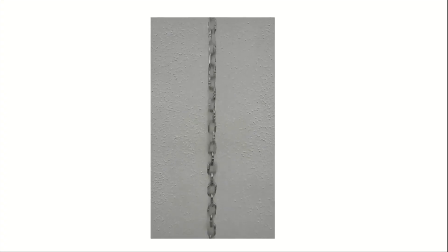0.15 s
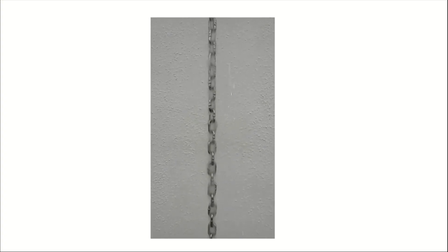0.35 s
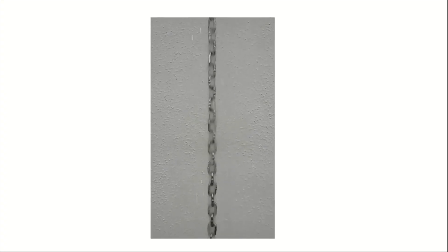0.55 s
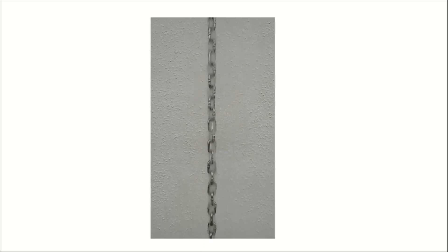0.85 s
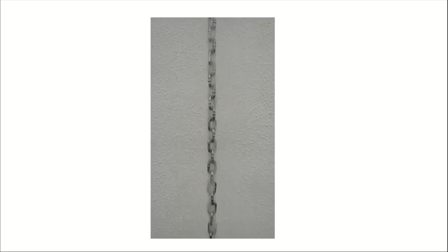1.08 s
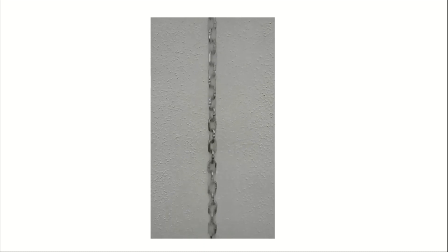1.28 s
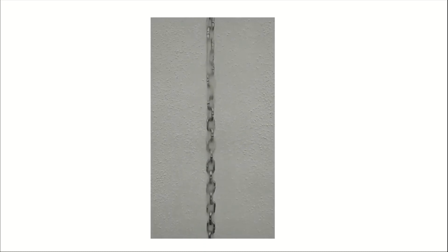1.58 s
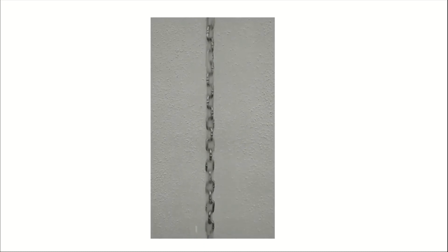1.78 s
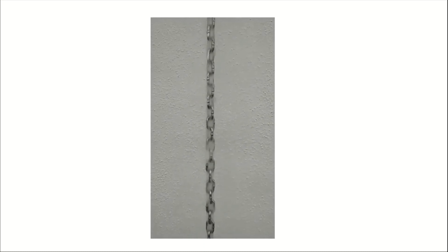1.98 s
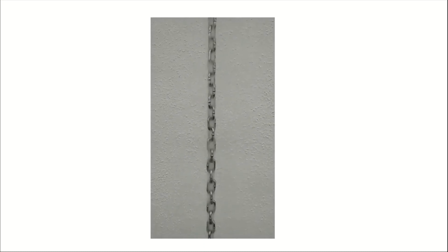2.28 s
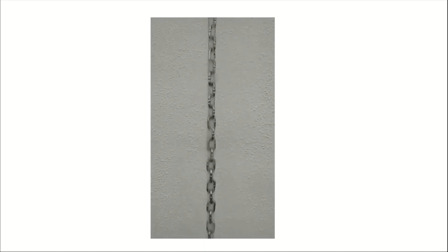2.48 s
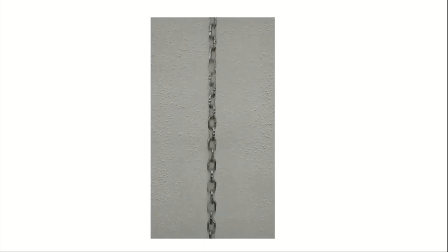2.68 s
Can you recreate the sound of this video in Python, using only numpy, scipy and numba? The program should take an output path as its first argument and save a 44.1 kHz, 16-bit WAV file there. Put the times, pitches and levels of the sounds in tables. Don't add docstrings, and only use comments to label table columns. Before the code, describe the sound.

Water splattering off a hanging chain onto hard wet ground, with low wind rumble, close up

```python
import sys
import numpy as np
from scipy import signal
from scipy.fft import rfft, irfft
from scipy.io import wavfile
from scipy.ndimage import uniform_filter1d
from numba import njit

SR = 44100
rng = np.random.default_rng(int(sys.argv[2]) if len(sys.argv) > 2 else 0)


def digitize_waveform(pressure):
    field = np.atleast_2d(pressure).T
    bounded = np.clip(field, -1, 1)
    quanta = np.round(bounded * 32767).astype(np.int16)
    wavfile.write(sys.argv[1], SR, quanta)


def boost_factor(decibels):
    exponent = np.asarray(decibels, float) / 20
    return 10 ** exponent


N = 125685
TREBLE_HZ = 7720

# start_s, level_db
GUSTS = [
    (0.0, -32.5),
    (0.33, -31),
    (0.61, -33),
    (0.75, -30.5),
    (1.2, -29.5),
    (1.5, -28),
    (2.21, -32),
    (2.48, -28.5),
    (2.78, -33),
    (2.85, -33),
]
# frequency_hz, density_db_per_hz
WIND_COLOUR = [(15, -63), (25, -26), (48, -37.5), (104, -6.5), (150, -1.5), (247, -1), (340, -17),
               (550, -18), (1150, -28.5), (1500, -40), (2530, -120)]
# time_s, peak_db, pitch_hz
WIND_KNOCKS = [(0.255, -22, 157), (0.409, -21, 162), (0.565, -23.5, 156), (1.07, -16, 223),
               (1.133, -22, 183), (1.281, -24, 170), (1.526, -16, 223), (1.581, -21.5, 133),
               (1.766, -19, 151), (1.807, -22, 200), (1.909, -20, 133), (2.116, -27, 180),
               (2.722, -20.5, 156), (0.658, -16, 151), (0.792, -17, 155), (0.829, -16, 135),
               (2.348, -9.5, 156), (2.395, -9, 135), (2.459, -6.5, 165), (2.509, -10.5, 145),
               (2.526, -15, 140), (2.635, -13, 149)]
# frequency_hz, density_db_per_hz
GROUND_COLOUR = [(740, -38.5), (1250, -13.5), (1850, -3), (2870, -9), (4100, -1), (5300, -0.5),
                 (6300, -8.5), (8530, -13.5), (10500, -10), (13000, -13)]
# start_s, level_db, dull_drop_weight_db
WATER_FLOW = [
    (0.0, -23.5, 5),
    (0.34, -20.5, 6),
    (0.67, -21.5, 3.5),
    (0.91, -19.5, 5),
    (1.76, -20, 4.5),
    (2.02, -24, 1.5),
    (2.62, -21.5, -4),
    (2.85, -27, 0),
]
# time_s, peak_db, pitch_hz
LOW_GURGLES = [
    (0.166, -24.5, 700),
    (0.2, -18, 580),
    (0.279, -20, 544),
    (0.337, -19, 690),
    (0.757, -25, 600),
    (1.448, -27, 750),
    (1.588, -25, 460),
    (1.756, -23, 660),
    (1.88, -26, 690),
    (2.026, -31, 567),
]
# time_s, peak_db, pitch_hz
SPRAY_FLICKS = [(0.103, -12, 10800), (0.168, -18, 11500), (0.3044, -13, 10700), (0.399, -14, 12300),
                (0.412, -8, 12500), (0.5821, -19, 11900), (0.8086, -25, 11600), (0.9123, -10, 9970),
                (1.0119, -4.5, 10400), (1.0501, -2, 12200), (1.1463, -29, 10700), (1.1777, -22, 11700),
                (1.2246, -8, 10900), (1.3623, -13, 10300), (1.3976, -6, 11500), (1.417, -9, 10400),
                (1.5075, -12, 12100), (1.5609, -10, 12300), (1.5876, -1, 11800), (1.6202, -12, 11000),
                (1.6415, -13, 9330), (1.6682, -10, 11300), (1.736, -8, 11800), (1.8582, -24, 11000),
                (1.8731, -17, 10100), (2.3057, -17, 11500), (2.388, -7, 10500), (2.7244, -9, 10200),
                (2.7681, -16, 11400), (2.7815, -7, 12100)]
# time_s, peak_db, centre_hz
FLAT_SLAPS = [
    (0.4658, -12, 3640),
    (2.0343, -7, 2940),
    (2.1782, -10, 3270),
    (2.7239, -3, 3800),
]
# time_s, peak_db, pitch_hz
STONE_SPLATS = [(0.0176, -12, 4250), (0.0282, -2, 4640), (0.168, -17, 5200), (0.2306, -8, 4370),
                (0.2485, -5, 4870), (0.287, -7, 4680), (0.3382, -7, 4370), (0.4658, -22, 5660),
                (0.4645, -1, 4800), (0.5626, -8, 5140), (0.5746, -8, 5060), (0.6939, -2.5, 5100),
                (0.76, -9, 4220), (0.7954, -10.5, 4530), (0.857, -11, 4900), (0.873, -6, 4200),
                (0.946, -4, 4570), (0.9826, -7.5, 4020), (1.0101, -5.5, 4130), (1.0264, -1, 4400),
                (1.05, -19, 3960), (1.0651, 1.5, 4640), (1.146, -15, 4830), (1.1786, -4, 4710),
                (1.1995, -9, 4660), (1.2281, -9, 4070), (1.2405, -5, 4100), (1.299, -14, 5190),
                (1.3289, -10, 4670), (1.3546, -6, 5150), (1.4206, -2, 4560), (1.487, -16, 3970),
                (1.5094, -11.5, 3580), (1.5645, 1, 4600), (1.587, -4.5, 3960), (1.6104, -4.5, 4440),
                (1.6413, -2.5, 3650), (1.6676, -10, 4700), (1.709, -7, 3580), (1.735, -13, 4400),
                (1.7638, -3.5, 5210), (1.8598, -3.5, 5050), (1.9165, -10, 4230), (1.9167, -2, 4000),
                (2.0339, -9, 3400), (2.0632, -10, 3930), (2.162, -22, 3790), (2.1804, -5.5, 4230),
                (2.203, -34, 4400), (2.2209, -18, 4600), (2.236, -6, 4020), (2.266, -18, 4770),
                (2.4109, -8, 5250), (2.4611, -2, 4230), (2.591, -9, 4620), (2.6849, -8.5, 3780),
                (2.7337, -20, 3180), (2.7333, -1, 4650), (2.7696, -15, 4970), (2.817, -12, 4830)]
# time_s, peak_db, pitch_hz
WATER_PLOPS = [(0.014, -13, 2100), (0.1338, -6.5, 1890), (0.1674, -8, 2230), (0.2292, -11, 2160),
               (0.281, -6.5, 1870), (0.368, -24, 1760), (0.4104, -9.5, 1740), (0.4559, -7.5, 2220),
               (0.617, -14, 1820), (0.702, -15, 1830), (0.7357, -11.5, 2120), (0.7519, -10.5, 1690),
               (0.85, -28, 1760), (0.862, -14, 1880), (0.8959, -9.5, 1800), (0.9557, -17, 1790),
               (0.9821, -11, 2270), (1.061, -11, 2250), (1.146, -16, 1840), (1.1781, -5.5, 1800),
               (1.2006, -11, 1960), (1.2163, -11, 2270), (1.258, -18, 1880), (1.2765, -12, 2060),
               (1.297, -20, 1800), (1.3294, -10, 1860), (1.4026, -14, 1520), (1.48, -20, 1860),
               (1.514, -28, 2030), (1.5863, -11, 2250), (1.6197, -5, 1810), (1.641, -22, 2170),
               (1.6726, -14, 2000), (1.6873, -12, 1930), (1.735, -6, 1830), (1.7613, 0, 1850),
               (1.838, -12, 1830), (1.9163, -7, 1920), (1.9838, -7, 2400), (2.0359, -6, 2200),
               (2.1615, -17, 2450), (2.1782, -3, 2800), (2.2355, -20, 1240), (2.2349, -6, 2030),
               (2.335, -20, 1840), (2.381, -11.5, 2400), (2.462, -14, 1820), (2.5042, -20, 2340),
               (2.6967, -11, 2580), (2.7243, -4.5, 2150)]
# start_s, length_s, stray_side_level_db, treble_share_to_side (0-1)
SIDE_STRAYS = [
    (0.511, 0.028, -23, 0.2),
    (0.531, 0.042, -43, 0.73),
    (0.989, .05, -22, 0.06),
    (1.04, 0.022, -62, 0.07),
    (1.734, 0.042, -15, 0.08),
    (1.761, 0.049, -34, 0.57),
    (2.031, 0.052, -26.5, 0.1),
    (2.072, 0.03, -47, 0.4),
    (2.73, 0.037, -21, 0.06),
    (2.807, 0.08, -27, 0.6),
]
# start_s, length_s
TOP_OPENINGS = [
    (0.47, 0.049),
    (0.97, 0.125),
    (1.41, 0.012),
    (1.493, 0.028),
    (1.57, 0.07),
    (2.012, 0.035),
    (2.174, 0.032),
    (2.722, 0.016),
    (2.78, 0.036),
]


def unit(x):
    return x / np.sqrt(np.mean(x ** 2))


def curve(table, column):
    p = np.array(table)
    return np.interp(np.arange(N) / SR, p[:, 0], p[:, column])


def walk(rate_hz):
    hold = int(SR / rate_hz)
    steps = np.repeat(rng.standard_normal(N // hold + 1), hold)
    return unit(uniform_filter1d(uniform_filter1d(steps, hold), hold)[:N])


def shape(x, points):
    p = np.array(points)
    db = np.interp(np.log(np.linspace(1, SR / 2, 4097)), np.log(p[:, 0]), p[:, 1])
    cepstrum = irfft(db * np.log(10) / 20)
    cepstrum[1:4096] *= 2
    cepstrum[4097:] = 0
    return signal.fftconvolve(x, irfft(np.exp(rfft(cepstrum))))[:N]


def cut(x, hz=1213):
    return signal.sosfilt(signal.butter(8, hz, "high", fs=SR, output="sos"), x)


def ground(x):
    return cut(shape(x, GROUND_COLOUR))


def wind():
    t = np.arange(N) / SR
    level_db = curve(GUSTS, 1) + 1.27 + 1.47 * walk(10.96)
    x = unit(shape(rng.standard_normal(N), WIND_COLOUR)) * boost_factor(level_db)
    for at, db, hz in WIND_KNOCKS:
        cycle = (t - at) * hz
        x = x + boost_factor(db) * np.exp(-(cycle / 1.01) ** 2) * np.cos(2 * np.pi * cycle)
    return x


@njit
def splash(at, hz, cycles, burst, peak, noise):
    out, grain = np.zeros(len(noise)), np.zeros(2048)
    for e in range(len(at)):
        pole = np.exp(hz[e] / SR * (2j * np.pi - 1 / cycles[e]))
        start = int(at[e] * SR)
        n = min(int(8 * SR * (burst[e] + cycles[e] / hz[e])), 2048, len(out) - start)
        first, second, top = 0j, 0j, 1e-12
        for i in range(n):
            u = i / (burst[e] * SR)
            first = first * pole + u * np.exp(-u) * noise[start + i]
            second = second * pole + first
            grain[i] = second.real
            top = max(top, abs(grain[i]))
        for i in range(n):
            out[start + i] += grain[i] * peak[e] / top
    return out


def splats(table, cycles, burst_s, spray_db, tick_db, crack_db=None):
    t, db, hz = np.array(table, float).T
    t = t + 0.0007
    x = splash(t, hz, cycles + 0 * t, burst_s + 0 * t, boost_factor(db), rng.standard_normal(N))
    at = (t * SR).astype(int)
    if crack_db is not None:
        crack = np.zeros(N)
        crack[at] = boost_factor(1.4 * db + crack_db) * np.sign(rng.standard_normal(len(t)))
        x = x + ground(crack)
    hit = np.zeros(N)
    hit[at] = boost_factor(db)

    def fade(seconds):
        return signal.lfilter([1], [1, -np.exp(-1 / (seconds * SR))], hit)

    envelope = boost_factor(spray_db) * fade(0.0035) + boost_factor(tick_db) * fade(0.00036)
    envelope = uniform_filter1d(envelope, size=30, origin=14)
    return x + envelope * unit(ground(rng.standard_normal(N)))


def gurgles():
    return splats(LOW_GURGLES, 0.62, 0.00068, spray_db=-12, tick_db=5)


def rush():
    drops_per_s, middle_hz, octaves = 800, 3996, 1.154
    when, size, pitch_a, pitch_b, softness = rng.random((int(drops_per_s * N / SR), 5)).T
    peak = boost_factor(np.minimum(-4.5 * np.log(size), 9))
    hz = np.clip(middle_hz * 2 ** (2 * octaves * (pitch_a + pitch_b - .8)), 1300, 13000)
    burst_s = 0.00053 * (0.52 + 2 * softness)
    drops = splash(when * N / SR, hz, 0.7 + 0 * hz, burst_s, peak, rng.standard_normal(N))
    spec = rfft(drops)
    flat = irfft(spec / np.sqrt(uniform_filter1d(np.abs(spec) ** 2, size=1500) + 1e-9), N)
    mist = boost_factor(-1.5 + 2 * walk(150)) * rng.standard_normal(N)
    x = ground(boost_factor(-0.5) * unit(flat) + mist)
    tail = rng.standard_normal(2000) * np.exp(-np.arange(2000) / SR / 0.0041)
    tail = tail / np.sqrt(np.sum(tail ** 2))
    x = unit(x + boost_factor(-10.5) * signal.fftconvolve(x, tail)[:N])
    dull = signal.sosfilt(signal.butter(2, 2800, fs=SR, output="sos"), x)
    x = x + (boost_factor(curve(WATER_FLOW, 2)) - 1) * dull
    return x * boost_factor(curve(WATER_FLOW, 1) + 1.0 + 1.4 * walk(60))


def flicks():
    return splats(SPRAY_FLICKS, 0.79, 0.00015, spray_db=-19, tick_db=-22)


def big_drops():
    plops = splats(WATER_PLOPS, 1.24, 0.00015, spray_db=-15.5, tick_db=-6, crack_db=16)
    spats = splats(STONE_SPLATS, 1.53, 0.00021, spray_db=-15.5, tick_db=-2.5, crack_db=-4)
    slaps = splats(FLAT_SLAPS, 0.65, 0.00017, spray_db=-15.5, tick_db=-2.5)
    return plops + spats + slaps


def scene():
    x = wind() + gurgles() + rush() + cut(big_drops() + flicks(), hz=1215)
    return np.array([x, x])


def duck(x):
    threshold_db, ratio, recovery_s = -10.5, 0.33, 0.028
    level = uniform_filter1d(np.abs(x), size=90, origin=44)
    over = np.maximum(level - boost_factor(threshold_db) / 2, 0)
    over = signal.lfilter([1 / (recovery_s * SR)], [1, -np.exp(-1 / (recovery_s * SR))], over)
    return np.tanh(x / (1 + 40 * ratio * over))


def starve(x):
    f, _, z = signal.stft(x, SR, nperseg=2048)
    power = np.mean(np.abs(z[:1024].reshape(128, 8, -1)) ** 2, axis=1)
    power = np.repeat(power, 8, axis=0)
    z[:1024] *= (power > boost_factor(2 * -64.5)) | (f[:1024, None] < TREBLE_HZ)
    return signal.istft(z, SR)[1][:N]


def gate(start_s, length_s, ramp_s, offset=0):
    t = np.arange(N) / SR
    return np.clip(np.minimum(t - start_s, start_s + length_s - t) / ramp_s + offset, 0, 1)


def very_top(spec, hz):
    open_hz = 13500
    slope_db = -10 - np.maximum(hz - open_hz, 0) / 130
    top = irfft(spec * (hz > open_hz) * boost_factor(slope_db), N)
    return top * sum(gate(at, length, 0.003) for at, length in TOP_OPENINGS)


def low_pass(x):
    return signal.sosfilt(signal.butter(12, 15720, fs=SR, output="sos"), x)


def record(dry):
    mid = duck(dry[0])
    spec, hz = rfft(mid), np.arange(N // 2 + 1) * SR / N
    top = very_top(spec, hz)
    spec = spec * boost_factor(-6.5 * np.exp(-((hz - 8700) / 200) ** 2))
    spec = spec * boost_factor(-7 * np.clip((hz - 13400) / 900 + 1, 0, 2.1))
    mid, treble = irfft(spec, N), irfft(spec * (hz > TREBLE_HZ), N)
    random_phase = np.exp(2j * np.pi * rng.random(len(spec)))
    hiss = unit(irfft(spec * random_phase, N)) * np.std(mid)
    stray, flip = 0, 0
    for at, length, db, share in SIDE_STRAYS:
        opening = gate(at, length, 0.004, offset=.5)
        stray = stray + boost_factor(db) * opening
        flip = flip + np.clip(share, 0, 1) * opening
    side = starve(stray * hiss + np.sqrt(flip.clip(0, 1)) * treble)
    mid = starve(mid - flip * treble) + top
    return low_pass(np.array([mid + side, mid - side]))


dry = scene()
out = record(dry)
digitize_waveform(out)
```